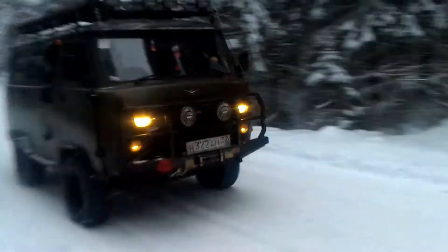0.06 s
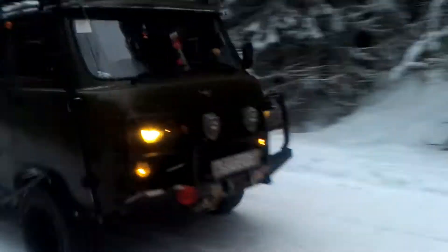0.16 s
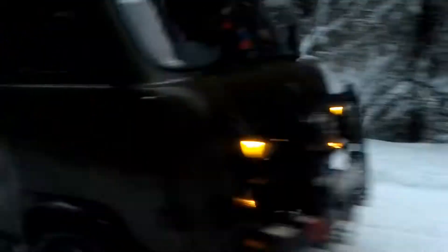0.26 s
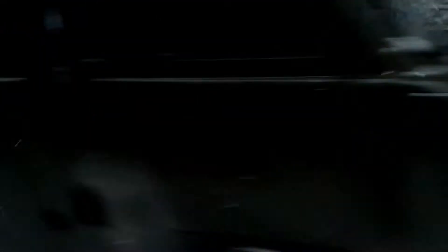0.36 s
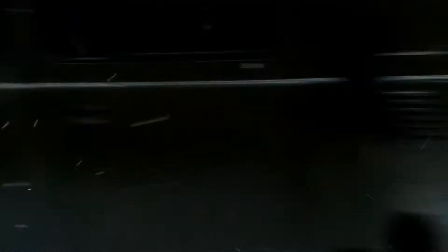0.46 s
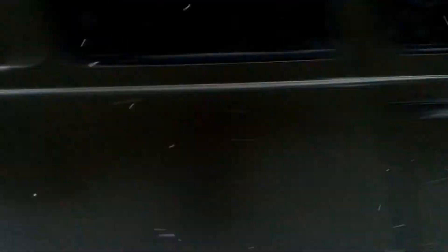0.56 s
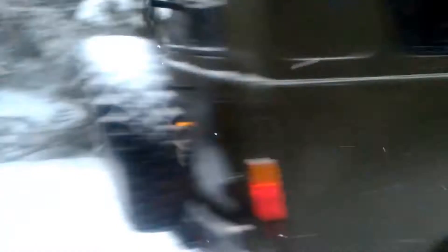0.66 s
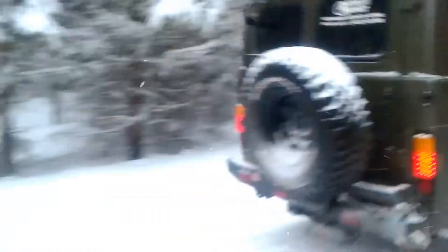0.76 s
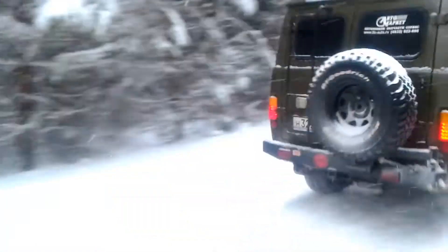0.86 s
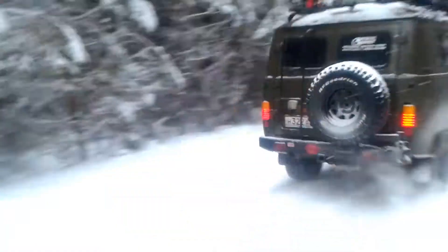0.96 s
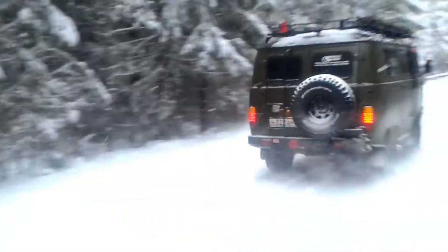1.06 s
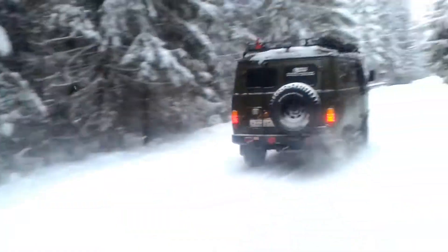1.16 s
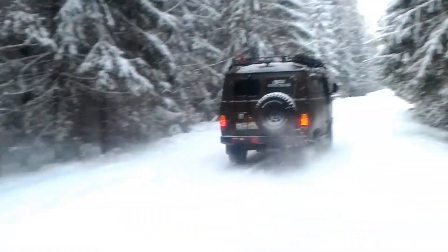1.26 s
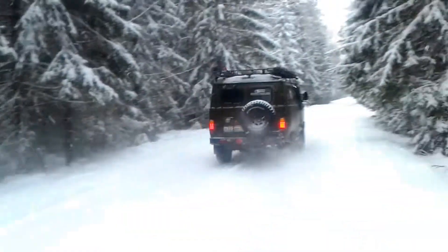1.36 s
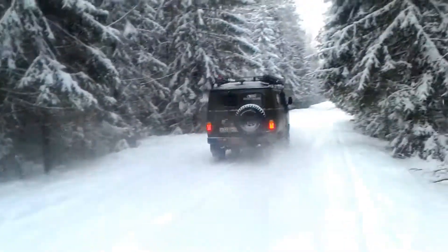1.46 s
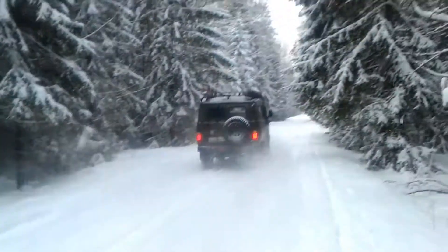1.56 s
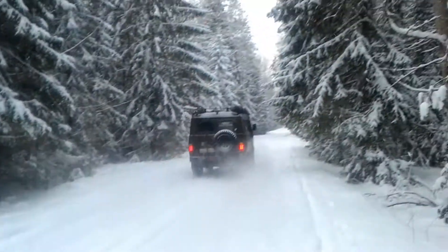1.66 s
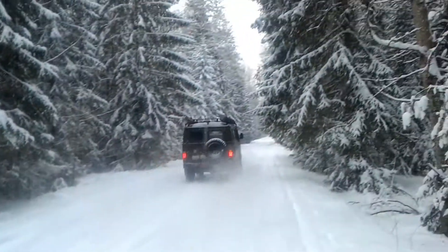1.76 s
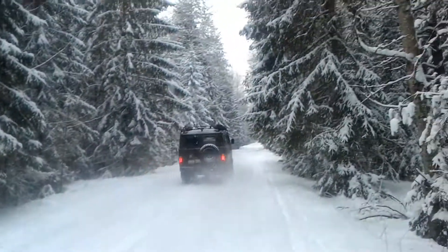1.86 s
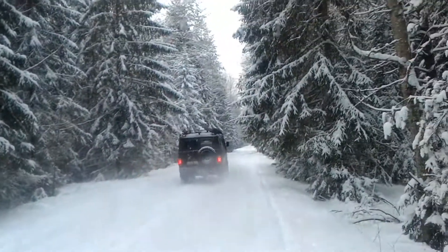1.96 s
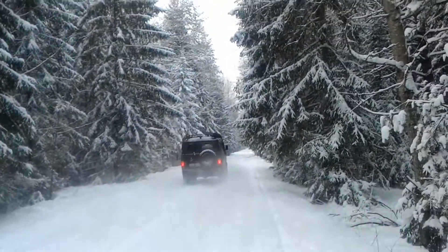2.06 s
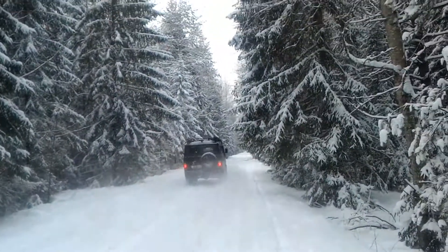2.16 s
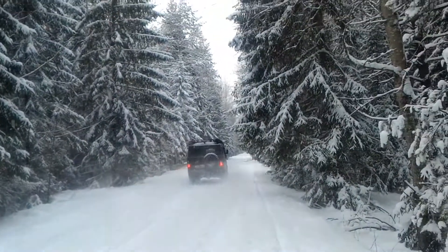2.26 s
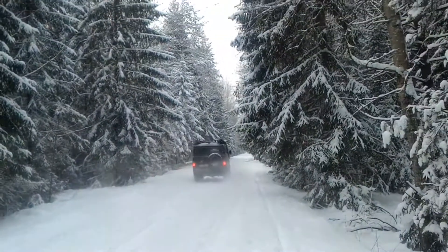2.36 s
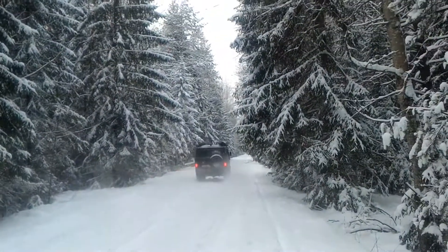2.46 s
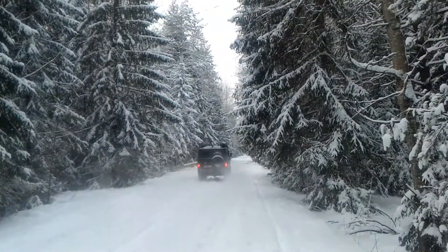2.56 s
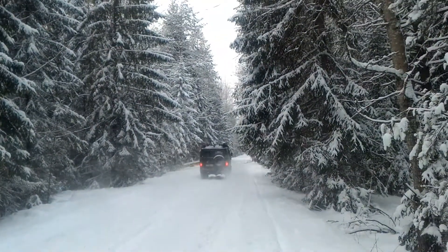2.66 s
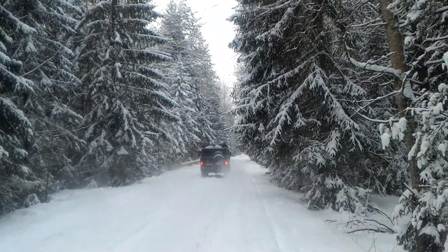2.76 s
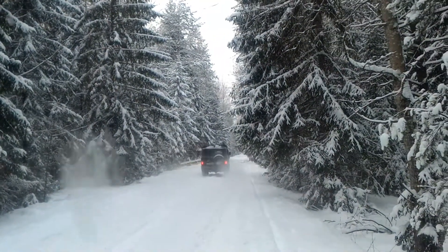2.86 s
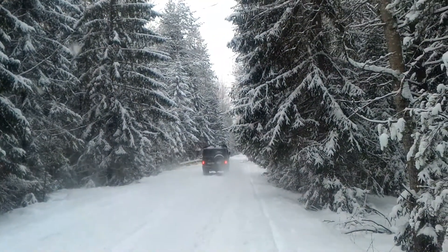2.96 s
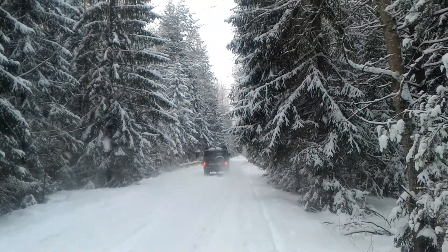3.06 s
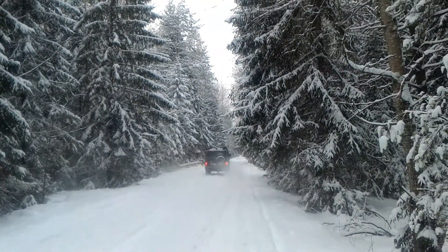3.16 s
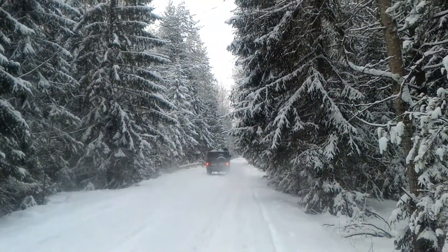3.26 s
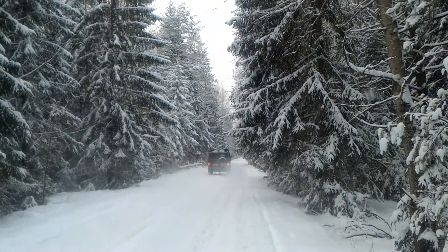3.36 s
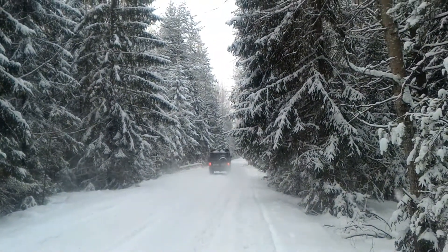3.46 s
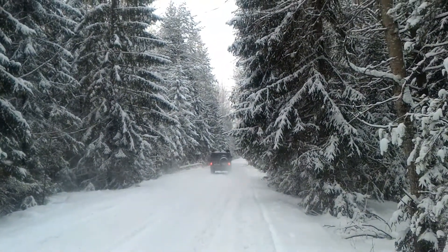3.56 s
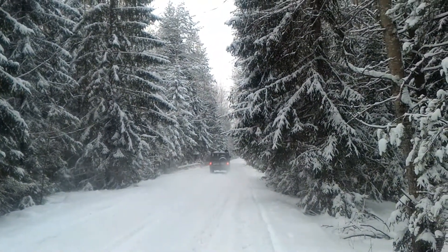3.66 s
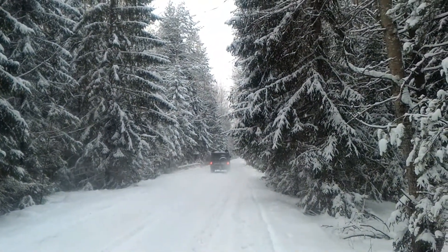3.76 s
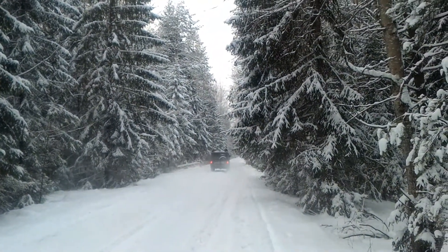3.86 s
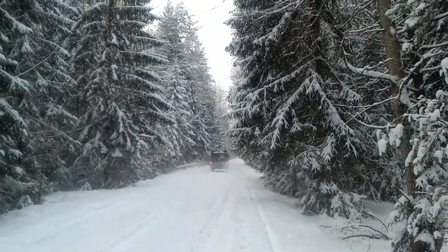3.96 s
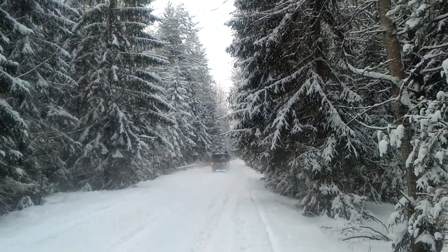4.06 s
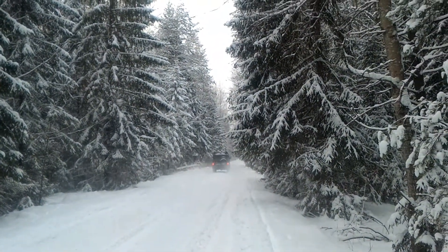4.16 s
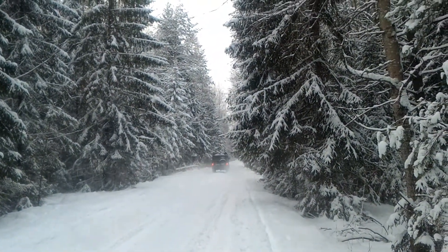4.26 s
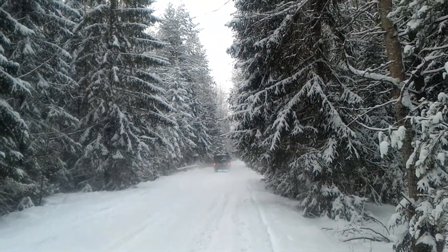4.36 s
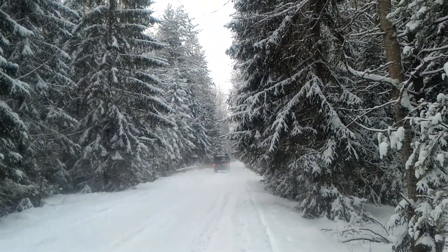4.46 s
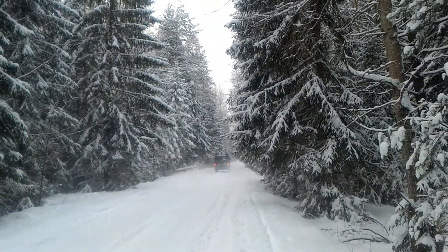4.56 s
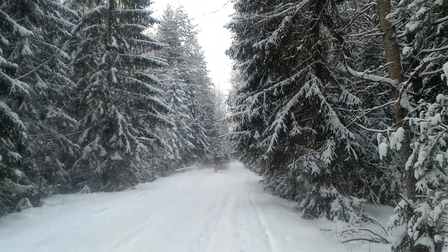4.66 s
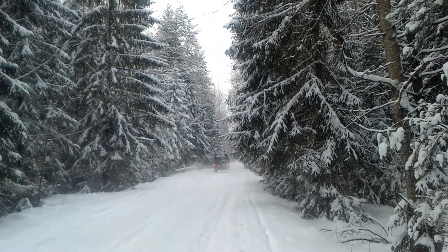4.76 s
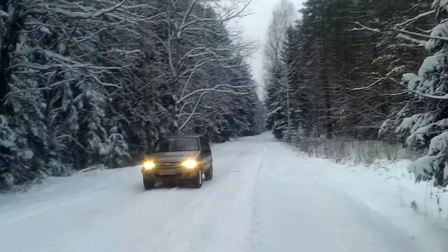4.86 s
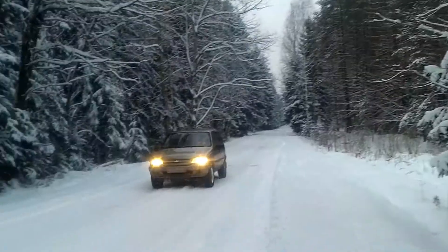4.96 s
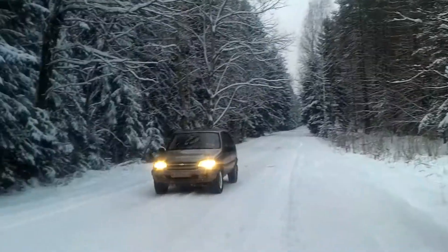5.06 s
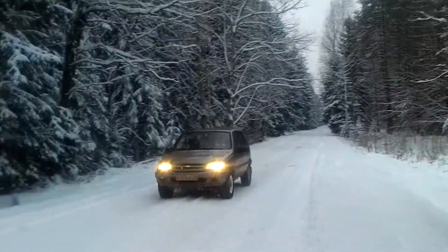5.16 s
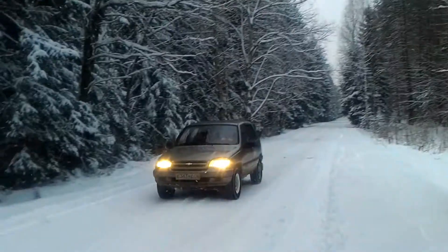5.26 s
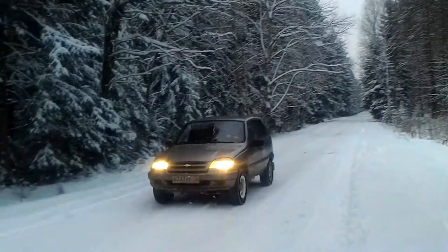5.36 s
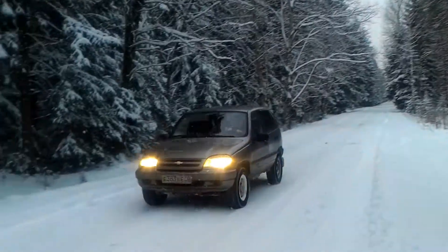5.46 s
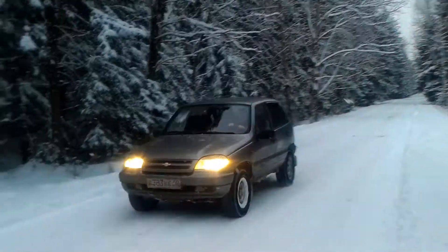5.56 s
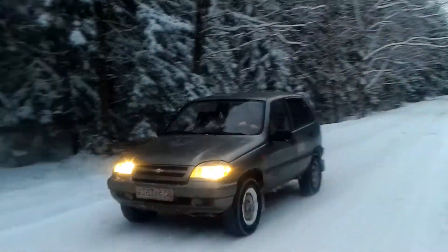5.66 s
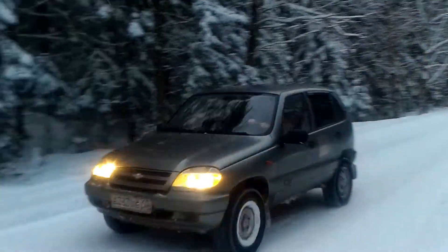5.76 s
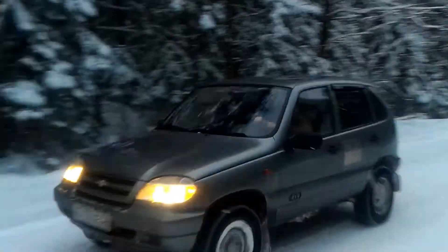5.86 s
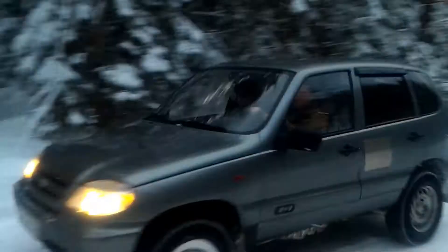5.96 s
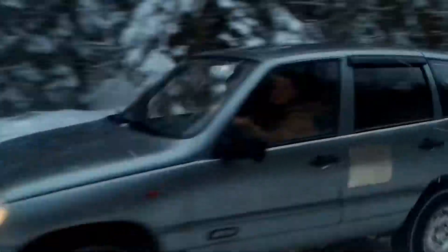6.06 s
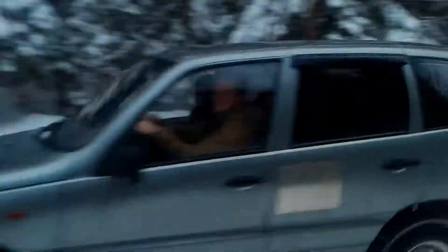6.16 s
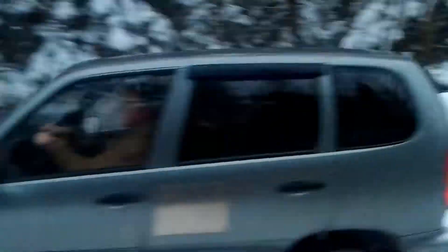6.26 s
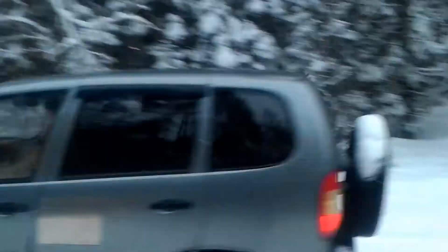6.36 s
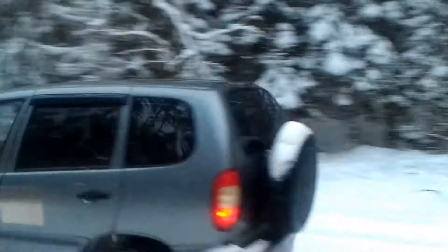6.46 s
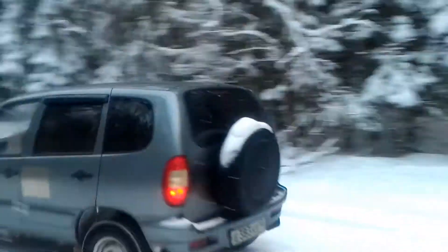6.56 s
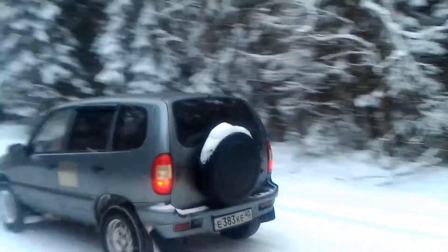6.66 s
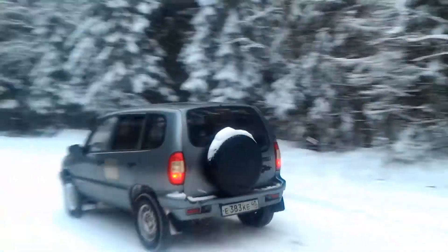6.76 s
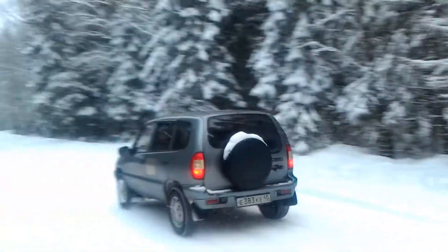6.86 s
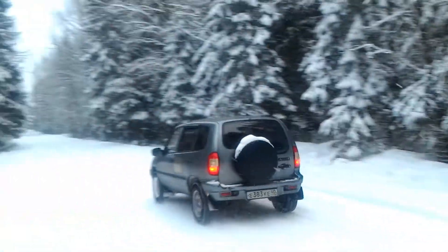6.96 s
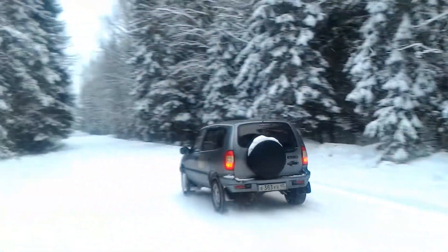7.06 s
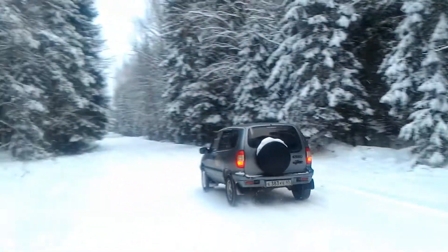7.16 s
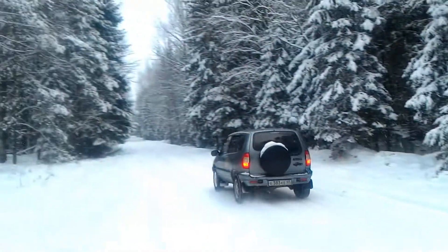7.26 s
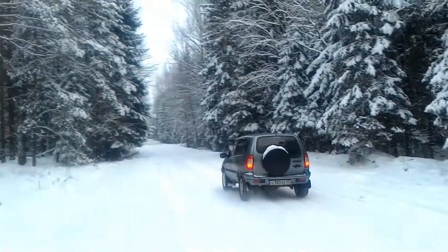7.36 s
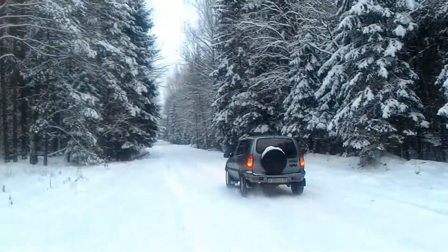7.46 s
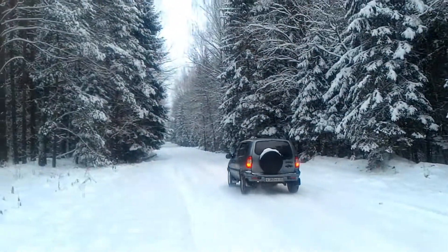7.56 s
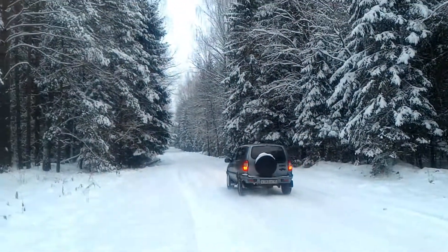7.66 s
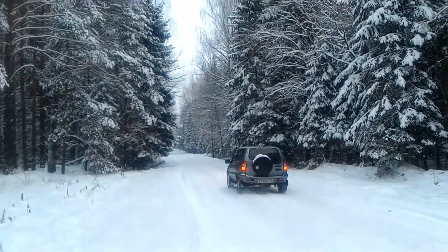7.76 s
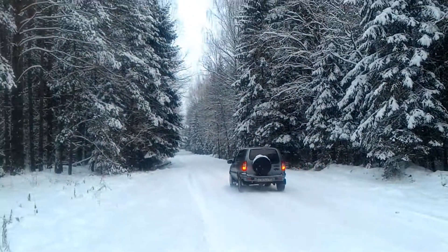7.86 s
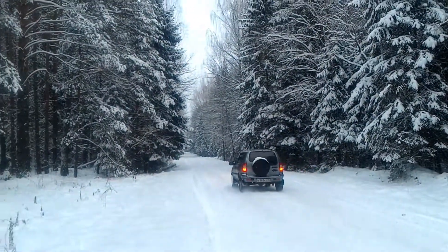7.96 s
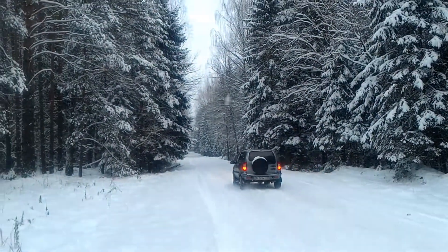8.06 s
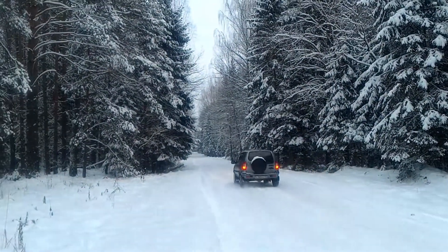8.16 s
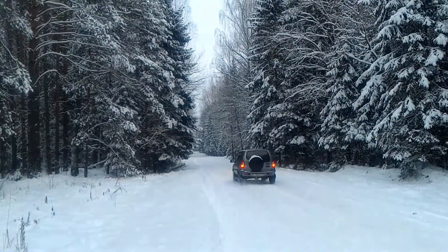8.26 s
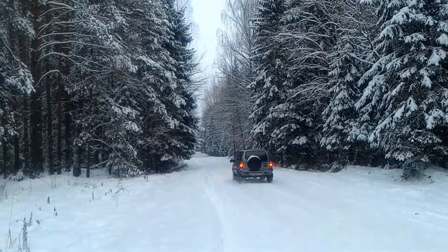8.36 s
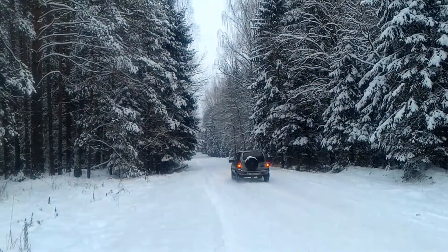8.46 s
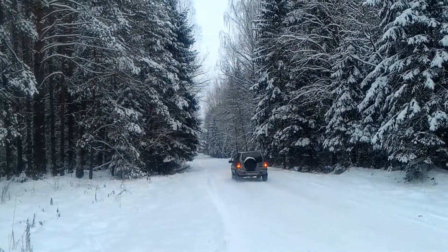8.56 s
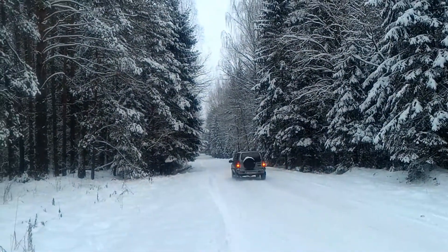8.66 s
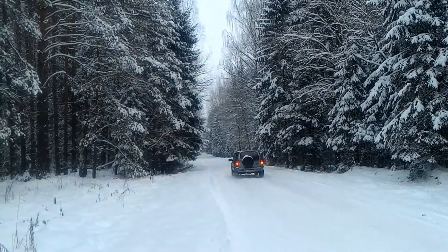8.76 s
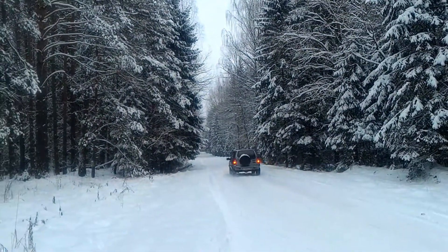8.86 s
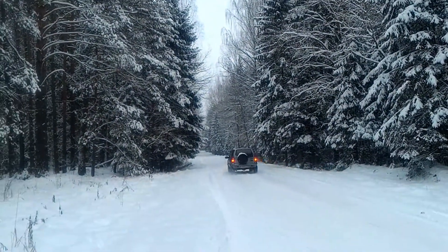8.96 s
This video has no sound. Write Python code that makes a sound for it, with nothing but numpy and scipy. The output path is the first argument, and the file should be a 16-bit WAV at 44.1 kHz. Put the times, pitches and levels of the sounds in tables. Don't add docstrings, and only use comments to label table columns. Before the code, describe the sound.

On a snowy forest road, a small microphone catches a van already bearing down at 0 s, with a deep exhaust drone, body roar and bright tyre hiss. It passes very close at about 0.7 s, pitch sliding down, with faint gear whine and wheels churning snow. Around 1.1-1.4 s loose parts knock drily and a swish of snow dust rises, then falls away. The drone sinks until nearly gone by 4 s, leaving thin snow hiss, a faint airy whistle and low wind buffets. At 4.9 s a sharp click cuts to a car approaching, with a tiny squeak at 5 s. Its lower, buzzier engine and tyre roar swell; dull snow crunches cluster at 5.6-6.3 s. It passes at 6.3 s, drops in pitch and recedes through wind thumps until 9 s, still audible, with a tiny ice tick near the end.

```python
import sys
import numpy as np
from scipy import signal
from scipy.fft import rfft, irfft, next_fast_len
from scipy.io import wavfile
from scipy.ndimage import uniform_filter1d

SR = 44100
rng = np.random.default_rng(int(sys.argv[2]) if len(sys.argv) > 2 else 0)


def master(y):
    cut = np.clip(np.atleast_2d(y).T, -1, 1)
    pcm = np.round(cut * 32767)
    wavfile.write(sys.argv[1], SR, pcm.astype(np.int16))


N = 397429
TIME = np.arange(N) / SR
CHANGE_S = 4.913

# closest approach t/s, speed [m/s], closest distance [m], firing f/Hz
VAN_PASS = (.68, 9.5, 1.256, 75.55)
CAR_PASS = (6.3, 8.6, 2.56, 53.15)
# t/s, level/dB
VAN_TONE = [(0, -16), (.1, -16), (.6, -16), (.7, -11.5), (1.2, -16), (2.2, -20), (3.2, -28), (3.6, -36),
            (3.9, -46)]
CAR_TONE = [(4.93, -30), (5.3, -24.5), (5.55, -23), (5.67, -20), (6.1, -18), (6.33, -14), (7.1, -17),
            (8.0, -19), (9.01, -26.5)]
# multiple of firing, level/dB from the front, level/dB from behind
VAN_ORDERS = [(0.502, -29, -17), (0.699, -16, -25), (2, -18.5, -20), (2.501, -26, -37), (3, -24, -21),
              (4, -22, -22)]
CAR_ORDERS = [(.5, -16, -25), (1.5, -16.5, -21.5), (2, -5.5, -11.5), (3, -8, -22.5), (4, -24, -27),
              (5, -23.5, -19), (7, -19, -30), (8, -24, -29.5)]
# f/Hz, level/dB per Hz
VAN_NEAR_ROAR = [(56, -43), (95, -3), (108, -11.5), (227, -4.5), (319, -4.5), (369, -5.5), (481, -7.5),
                 (850, -27.5), (1100, -60), (1870, -120)]
VAN_FAR_ROAR = [(56, -38), (95, -5), (124, -2), (182, 1), (397, -19.5), (481, -14), (701, -26.5),
                (850, -19), (1100, -37), (1870, -120)]
CAR_NEAR_ROAR = [(71, -46), (120, -5), (195, -4), (268, -7), (331, -9.5), (427, -9.5), (654, -21),
                 (850, -24.5), (1100, -62), (1870, -120)]
CAR_FAR_ROAR = [(71, -32), (120, -10.5), (151, -10), (263, -5.5), (308, -13), (403, -10), (613, -26.5),
                (850, -25.5), (1100, -51), (1870, -120)]
# f/Hz, level/dB per Hz
VAN_FRONT_HISS = [(380, -25.5), (650, -25), (875, -17), (1100, 2.5), (1200, -2), (1450, -3.5), (1820, -12),
                  (2200, -2.5), (2570, -5), (4060, -6.5), (6000, -27.5), (7800, -58), (13200, -120)]
VAN_REAR_HISS = [(380, -50), (650, -15), (820, -1), (1340, 0), (1630, -8), (1890, -14), (2080, -6.5),
                 (2430, -5), (2720, -1.5), (3130, -1.5), (3370, -16.5), (4210, -1.5), (4760, -18.5),
                 (5370, -17.5), (6000, -37.5), (7800, -62), (13200, -120)]
CAR_FRONT_HISS = [(380, -33), (650, -9.5), (883, -2), (1070, 1), (1270, -0.5), (1650, -12), (1950, -10.5),
                  (2410, -12), (3070, -10.5), (4250, -13), (6000, -33.5), (7800, -51), (13200, -120)]
CAR_REAR_HISS = [(380, -19), (650, -18), (720, -3.5), (1160, 4), (1680, -9), (1740, -12.5), (1980, -5),
                 (2320, -7.5), (2500, -2), (2930, -17), (3310, -6.5), (3880, -20), (4580, -9), (5170, -32),
                 (6000, -39), (7800, -53), (13200, -120)]
# f/Hz, level/dB per Hz
RUSTLE_COLOUR = [(2940, -31.5), (5000, -8.5), (6070, -6), (7480, -3), (8730, -5.5), (9380, -10.5),
                 (10200, -6.5), (13300, -57), (22000, -120)]
# t/s, level/dB
VAN_SNOW = [(0, 2), (.6, -0.5), (.76, -7.5), (.9, -6.5), (1.05, -4.5), (1.45, -7.5), (3.2, -6), (4.1, -8.5),
            (4.8, -11)]
CAR_SNOW = [(4.93, -0.5), (5.1, -4.5), (5.45, -0.5), (5.71, 2.5), (6.23, 0), (6.4, -2.5), (6.9, -5.5),
            (8.0, -6), (9.01, -11)]
# level/dB from the front, level/dB from behind, share of spreading loss, loss [dB/m], share of snow swing
VAN_LAYERS = [
    (-14.5, -16, 0.34, 0.2953, 0.074),
    (-31.5, -33, 0.058, -0.02, 0.95),
    (-33.5, -34, 0.025, 0.04, 0.94),
    (-49, -50, 0.055, 0.07, 1.19),
    (-21, -26.5, 0.083, 0.23, 0.11),
]
CAR_LAYERS = [
    (-24, -25.5, 0.32, 0.23, 0.27),
    (-33, -36, 0.033, 0.11, 0.84),
    (-38.5, -37.5, 0.058, .03, 1.02),
    (-52.5, -52, .05, .03, 1.08),
    (-22, -19, 0.32, .3, .1),
]
VAN_FAR = [
    (6.5, 1.5, .2, 0.74),
    (14, 15.7, 0.1, 0.93),
]
CAR_FAR = [
    (8.1, 1.5, 0.54, 0.91),
    (6.7, 1.25, 1, 0.74),
]
# f/Hz, level/dB per Hz
WAKE_COLOUR = [(1290, -28), (2200, -4), (2690, 1.5), (3450, -21.5), (3940, 2.5), (4080, 1), (4230, 1),
               (4630, -19), (5050, -10), (5680, -23.5), (6000, -25), (7800, -47), (13200, -120)]
# t/s, level/dB, half length [s]
WHINE_SWELLS = [(.1, -38, .2), (.55, -27, 0.17), (.85, -36.5, 0.24), (1.25, -45, 0.092), (1.75, -42, 0.14),
                (2.08, -39.5, 0.15), (2.75, -38, 0.22), (3.4, -43.5, 0.29)]
# t/s, level/dB, half length [s]
WHISTLE_SWELLS = [(3.92, -40.5, 0.13), (4.08, -34, 0.077), (4.27, -33.5, 0.081), (4.55, -37, 0.2)]
# t/s, peak level/dB
RATTLES = [(1.1274, -31), (1.183, -23.5), (1.1994, -27), (1.262, -19.5), (1.2824, -21), (1.3613, -32),
           (3.999, -35), (4.0893, -31), (7.1447, -34)]
# f/Hz, level/dB, 60 dB decay [s]
RATTLE_MODES = [(2700, 4, .012), (3800, 2, 0.022), (4340, 3.5, 0.016), (4700, -7, 0.011),
                (7200, -25, 0.0065), (8700, -9, 0.007)]
# t/s, peak level/dB
CRUNCHES = [(5.644, -17), (5.779, -19), (5.909, -17), (5.996, -14.5), (6.064, -26), (6.099, -23),
            (6.139, -23), (6.171, -21), (6.27, -16.5), (6.329, -25)]
# far f/Hz, rise when closest f/Hz, closest t/s, width f/Hz
UPPER_BAND = (2300, 900, 6.2, 290)
LOWER_BAND = (1850, 300, 6.33, 160)
# t/s, level/dB, half length [s]
UPPER_SWELLS = [(5.3, -48, 0.23), (5.72, -36.5, 0.21), (6.72, -43.5, 0.24), (7.1, -51, 0.18)]
LOWER_SWELLS = [(5.95, -50, 0.13), (6.28, -43, 0.22), (6.6, -53.5, .4)]
# half length [s], from f/Hz, to f/Hz, level/dB
SQUEAK = (.02, 4300, 3800, -41)
# t/s, level/dB, half length [s]
CHURN_SWELLS = [
    (.52, -30.5, 0.23),
    (5.68, -43, 0.16),
    (6.15, -38, 0.1),
]
# f/Hz, level/dB per Hz
CHURN_COLOUR = [(400, -14), (600, -1), (900, -3), (1500, -11.5), (2300, -9), (3200, -13), (4500, -35)]
# t/s, level/dB, half length [s]
GUSTS = [(.17, -25, .06), (.52, -21, .08), (3.06, -34, 0.03), (3.98, -23.5, 0.042), (4.07, -22, .03),
         (4.27, -23, 0.043), (4.36, -25.5, .03), (4.52, -30.5, 0.081), (4.83, -30, 0.069), (5.5, -26, 0.19),
         (6.05, -20.5, 0.094), (6.75, -20, 0.16), (7.1, -22, 0.16), (8.55, -37.5, 0.16)]
# f/Hz, level/dB per Hz
GUST_COLOUR = [(12, -30), (20, -5), (32, -0.5), (60, -2.5), (95, -11.5), (140, -26), (250, -47)]
# f/Hz, level/dB per Hz
RUMBLE_COLOUR = [(15, -39), (24, -26.5), (33, -8), (45, 5.5), (65, -6.5), (90, -9.5), (130, -20.5),
                 (250, -41)]


def from_db(db):
    return np.exp(np.asarray(db) * np.log(10) / 20)


def rms_one(x):
    return x / np.sqrt(np.mean(x ** 2) + 1e-20)


def in_time(rows):
    s, level_db = np.transpose(rows)
    return np.interp(TIME, s, level_db)


def swells(rows):
    return sum(from_db(db) * np.exp(-((TIME - s) / half_s) ** 2) for s, db, half_s in rows)


def bandpass(x, order, low_hz, high_hz):
    return signal.sosfilt(signal.butter(order, [low_hz, high_hz], "band", fs=SR, output="sos"), x)


def drift(rate):
    r = np.exp(-80 * np.pi * rate / SR)
    slow = signal.lfilter([1], [1, -2 * r, r * r], rng.standard_normal(N // 40 + 2002))[2000:]
    return np.interp(np.arange(N) / 40, np.arange(len(slow)), rms_one(slow))


def narrow(turns, width_hz):
    angle = 2 * np.pi * turns
    return drift(width_hz) * np.cos(angle) + drift(width_hz) * np.sin(angle)


def coloured(spectrum, patchy_db, count):
    size = next_fast_len(N)
    octave = np.log2(np.arange(size // 2 + 1) * SR / size + 1e-3)
    hz, level_db = np.transpose(spectrum)
    colour = from_db(np.interp(octave, np.log2(hz), level_db, left=-90, right=-90))
    shaped = rfft(rng.standard_normal(size)) * colour
    centres = np.linspace(np.log2(hz[0]), np.log2(hz[-1]), count)
    together = drift(25.0)
    out = 0
    for k in range(count):
        band = irfft(shaped * np.interp(octave, centres, np.arange(count) == k), size)[:N]
        out = out + band * from_db(patchy_db * (0.5 * together + drift(5.5)))
    return rms_one(out)


def turning(near, far, share, patchy_db, count):
    share = np.clip(share, 0, 1)
    near_noise = coloured(near, patchy_db, count)
    return np.sqrt(1 - share) * near_noise + np.sqrt(share) * coloured(far, patchy_db, count)


def place(course, ahead_s):
    closest_s, speed, gap_m, _ = course
    along = speed * (TIME - closest_s + ahead_s)
    metres = np.hypot(along, gap_m)
    return metres, (1 + along / metres) / 2


def passing(closest_s, speed, gap_m, firing_hz):
    along = speed * (TIME - closest_s)
    leaving = along / np.hypot(along, gap_m)
    return firing_hz / (1 + leaving * speed / 343), (1 + leaving) / 2


def engine(course, tone, orders, waver_db, waver_turns):
    hz, rear = passing(*course)
    turns = np.cumsum(hz) / SR + waver_turns * drift(3.6)
    skew = 1.1
    out = np.cos(2 * np.pi * turns - skew) * from_db(waver_db * drift(35.0))
    for multiple, front_db, rear_db in orders:
        gain = from_db(front_db + (rear_db - front_db) * rear + 2 * waver_db * drift(10.0))
        order_turns = multiple * turns + multiple * waver_turns * drift(5.8)
        out += gain * np.cos(2 * np.pi * order_turns - skew)
    sounding = np.clip((tone[-1][0] - TIME) / .1 + 1, 0, 1)
    return np.sqrt(2) * from_db(in_time(tone)) * out * sounding, turns


def road_noise(course, snow, layers, far, turns, roars, hisses, throb):
    metres, rear = place(course, 0.14)
    spread_db = 20 * np.log10(metres / course[2])
    snow_db = in_time(snow)
    gains = []
    for front_db, rear_db, share, loss_per_m, swing in layers:
        facing_db = front_db + (rear_db - front_db) * rear
        gains.append(from_db(facing_db - share * spread_db - loss_per_m * metres + swing * snow_db))
    roar_gain, tyre_gain, spray_gain, rustle_gain, rumble_gain = gains
    shares = []
    for half_m, over_m, ahead, behind in far:
        distant = (1 + np.tanh((metres - half_m) / over_m)) / 2
        shares.append((ahead + (behind - ahead) * rear) * distant)
    hiss_share, roar_share = shares

    size = next_fast_len(N)
    hiss = rfft(turning(*hisses, hiss_share, patchy_db=1.46, count=4), size)
    upper = np.clip((np.linspace(0, SR / 2, len(hiss)) - 1780) / 500 + .5, 0, 1)
    tyre = rms_one(irfft(hiss * (1 - upper), size)[:N])
    spray = rms_one(irfft(hiss * upper, size)[:N])
    pulse = 1 + throb * np.cos(2 * np.pi * turns)
    low = roar_gain * turning(*roars, roar_share, patchy_db=0.28, count=3) + tyre_gain * tyre
    rustle = rustle_gain * coloured(RUSTLE_COLOUR, patchy_db=.7, count=2)
    return pulse * low + spray_gain * spray + rustle, rumble_gain


def wake():
    after = np.maximum(TIME - 1.12, 0)
    rise = 1 - np.exp(-after / 0.061)
    fall = from_db(-32) * np.exp(-after / 0.5) + from_db(-48.5) * np.exp(-after / 2.5)
    dust = coloured(WAKE_COLOUR, patchy_db=2.0, count=3)
    rustle = from_db(-19) * coloured(RUSTLE_COLOUR, patchy_db=2.5, count=2)
    return rise * fall * (dust + rustle)


def whine():
    gearbox_ahead_s, teeth_per_firing = .12, 28.8
    hz, _ = passing(VAN_PASS[0] - gearbox_ahead_s, *VAN_PASS[1:])
    turns = teeth_per_firing * np.cumsum(hz) / SR
    near = swells(WHINE_SWELLS[:2]) * narrow(turns, width_hz=99)
    later = swells(WHINE_SWELLS[2:]) * narrow(turns, width_hz=38)
    whistle = swells(WHISTLE_SWELLS) * narrow(2670 * TIME, width_hz=160)
    return from_db(-6.0) * (near + later) + from_db(-5.5) * whistle


def rattles():
    at = [round(row[0] * SR) for row in RATTLES]
    peak_db = np.array(RATTLES)[:, 1]
    luck_db = rng.normal(0, 1.5, (len(at), len(RATTLE_MODES)))
    contact = np.hanning(260)[60:] * rng.standard_normal((len(RATTLE_MODES), 200))
    out = np.zeros(N)
    for k, (hz, level_db, t60) in enumerate(RATTLE_MODES):
        knocks = np.full(N, 1e-18)
        knocks[at] = from_db(peak_db + level_db - 25.0 + luck_db[:, k])
        scrape = signal.oaconvolve(knocks, contact[k])[:N]
        r, w = from_db(-60 / (t60 * SR)), 2 * np.pi * hz / SR
        out += signal.lfilter([0, np.sin(w)], [1, -2 * r * np.cos(w), r * r], scrape)
    return bandpass(out, 6, 2000, 9800)


def crunches():
    strength = np.zeros(N)
    strength[[round(s * SR) for s, _ in CRUNCHES]] = from_db(np.array(CRUNCHES)[:, 1] - 9)
    fall = np.exp(-1 / (0.0041 * SR))
    burst = signal.lfilter([1], [1, -fall], strength + 1e-18) * rng.standard_normal(N)
    return 3 * bandpass(burst, 4, 600, 3600)


def ground_bands():
    out = 0
    for band, rows in ((UPPER_BAND, UPPER_SWELLS), (LOWER_BAND, LOWER_SWELLS)):
        far_hz, rise_hz, closest_s, width_hz = band
        metres, _ = place(CAR_PASS, CAR_PASS[0] - closest_s)
        hz = far_hz + rise_hz * CAR_PASS[2] / metres
        out = out + swells(rows) * narrow(np.cumsum(hz) / SR, width_hz)
    return out


def squeak():
    half_s, from_hz, to_hz, level_db = SQUEAK
    progress = np.clip((TIME - 4.99) / half_s, -1, 1)
    turns = np.cumsum(from_hz + (to_hz - from_hz) * (progress + 1) / 2) / SR
    return from_db(level_db) * (1 - progress ** 2) * np.sin(2 * np.pi * turns)


def churn():
    return swells(CHURN_SWELLS) * coloured(CHURN_COLOUR, patchy_db=3.0, count=2)


def scene_change_click():
    after = TIME - CHANGE_S
    jump = -from_db(0.0) * np.exp(-np.maximum(after, 0) / 0.00011) * (after >= 0)
    return signal.sosfiltfilt(signal.cheby2(10, 40, 17400, fs=SR, output="sos"), jump)


def ice_tick():
    noise = bandpass(rng.standard_normal(N), 2, 5000, 7500)
    return swells([(8.9485, -54, .0015)]) * rms_one(noise)


def wind(rumble_gain):
    gust = coloured(GUST_COLOUR, patchy_db=-1.0, count=2)
    gust = gust / np.sqrt(uniform_filter1d(gust ** 2, size=2600) + .05)
    return rumble_gain * coloured(RUMBLE_COLOUR, patchy_db=0.5, count=2) + swells(GUSTS) * gust


def microphone_hiss(sound):
    loudness_db = 10 * np.log10(uniform_filter1d(sound ** 2, size=22050) + 1e-9)
    hiss = bandpass(rng.standard_normal(N), 4, 9300, 15000)
    return from_db(-62.5 - 0.23 * (loudness_db + 15.5)) * hiss


def ragged_top(x):
    frame = dict(window="cosine", nperseg=2048, noverlap=1024, fs=SR)
    hz, s, z = signal.stft(x, **frame)
    hiss_power = np.sum(np.abs(z[48:240]) ** 2, axis=0)
    hiss_db = 10 * np.log10(uniform_filter1d(hiss_power, size=9) + 1e-12)
    quiet_db = np.maximum(-35 - hiss_db, 0)
    luck = np.repeat(rng.exponential(1, (129, len(s))), 8, axis=0)[:len(hz)]
    edge_hz = 9350 + 15 * quiet_db
    fray_hz = 280 + 85 * quiet_db
    patch_hz = 8 * SR / 2048
    kept = hz[:, None] // patch_hz * patch_hz < edge_hz + fray_hz * luck
    return signal.istft(z * kept, **frame)[1][:N]


def scene():
    van_tone, van_turns = engine(VAN_PASS, VAN_TONE, VAN_ORDERS, waver_db=0.64, waver_turns=0.027)
    car_tone, car_turns = engine(CAR_PASS, CAR_TONE, CAR_ORDERS, waver_db=0.5, waver_turns=0.017)
    van_road, van_rumble = road_noise(
        VAN_PASS, VAN_SNOW, VAN_LAYERS, VAN_FAR, van_turns,
        (VAN_NEAR_ROAR, VAN_FAR_ROAR), (VAN_FRONT_HISS, VAN_REAR_HISS), throb=0.076)
    car_road, car_rumble = road_noise(
        CAR_PASS, CAR_SNOW, CAR_LAYERS, CAR_FAR, car_turns,
        (CAR_NEAR_ROAR, CAR_FAR_ROAR), (CAR_FRONT_HISS, CAR_REAR_HISS), throb=0.081)
    van = van_tone + van_road + wake() + whine()
    car = car_tone + car_road + ground_bands() + crunches() + squeak()
    van_time = TIME < CHANGE_S
    air = wind(np.where(van_time, van_rumble, car_rumble))
    return (np.where(van_time, van, car) + rattles() + churn() + ice_tick() + air)[None]


def low_pass(x):
    return signal.sosfilt(signal.butter(12, 16990, fs=SR, output="sos"), x)


def record(dry):
    heard = ragged_top(dry[0] + microphone_hiss(dry[0]))
    ends = np.clip(np.minimum(TIME, TIME[::-1]) / .004, 0, 1)
    mix = ((heard + scene_change_click()) * ends)[None]
    return low_pass(mix)


dry = scene()
out = record(dry)
master(out)
```